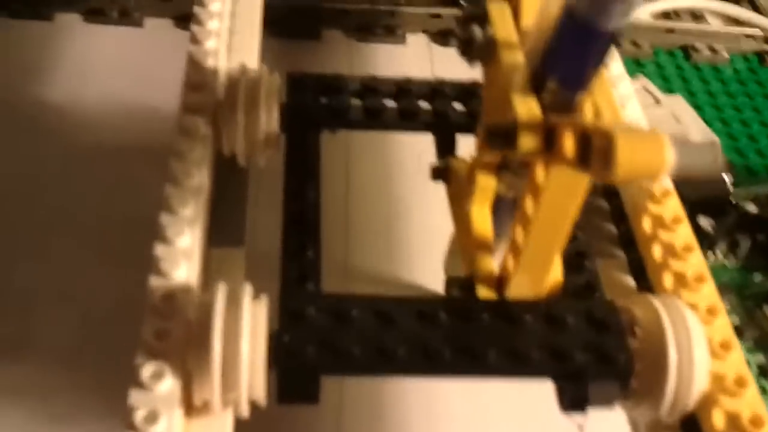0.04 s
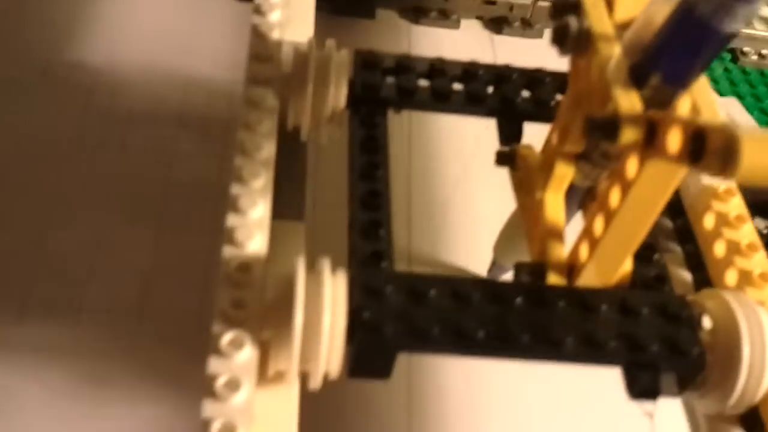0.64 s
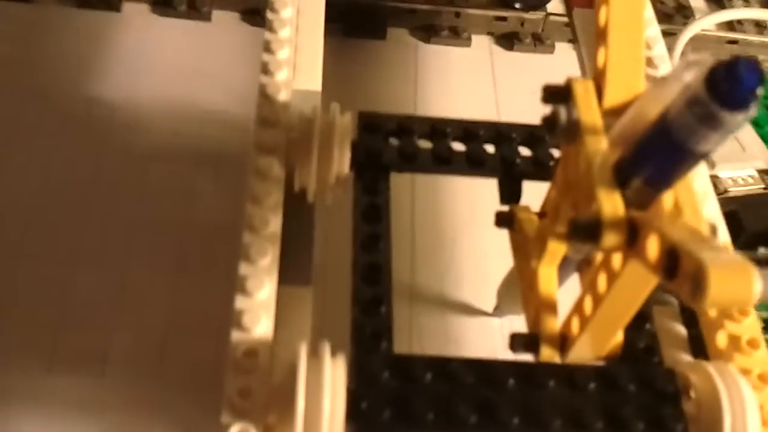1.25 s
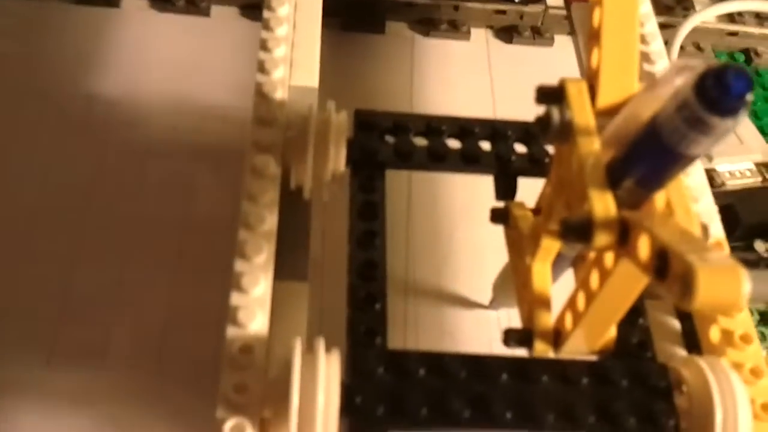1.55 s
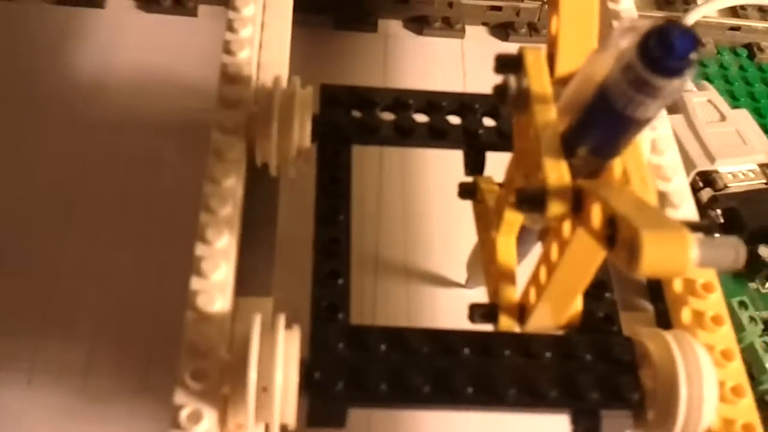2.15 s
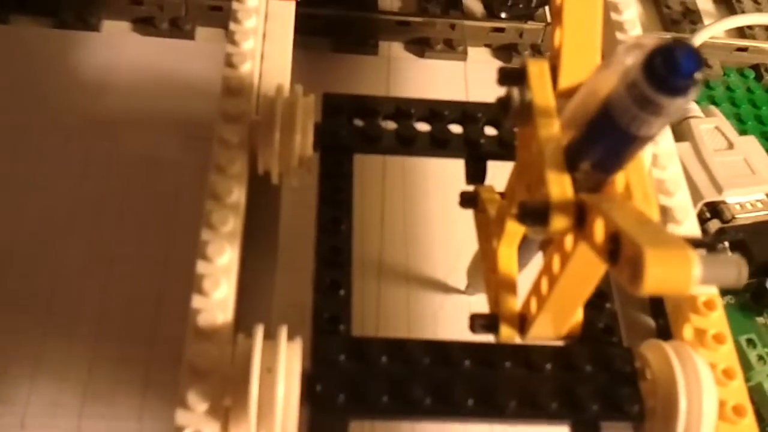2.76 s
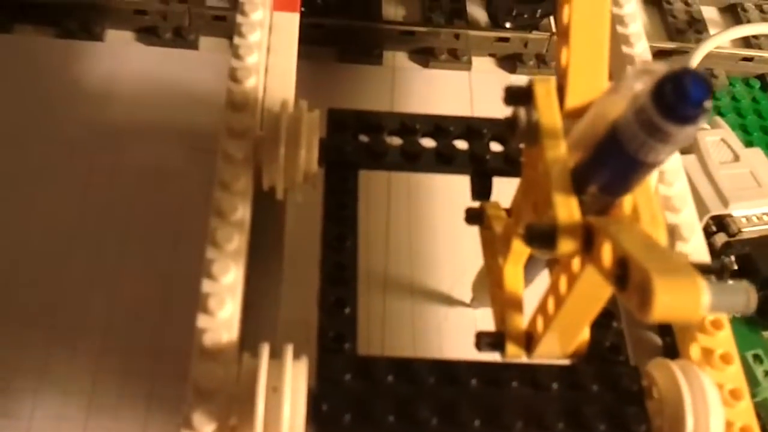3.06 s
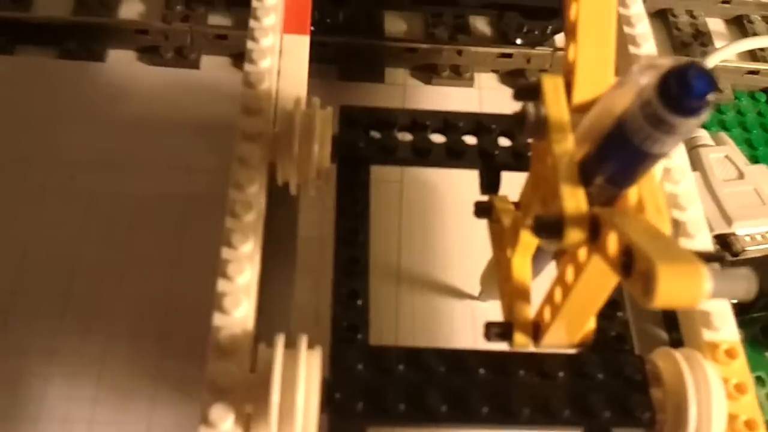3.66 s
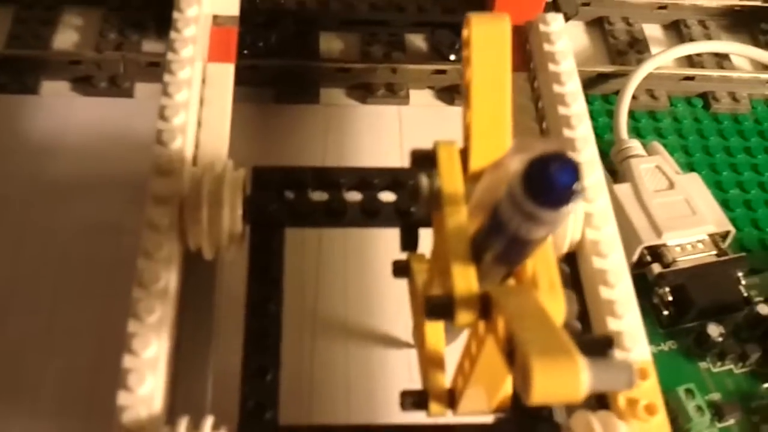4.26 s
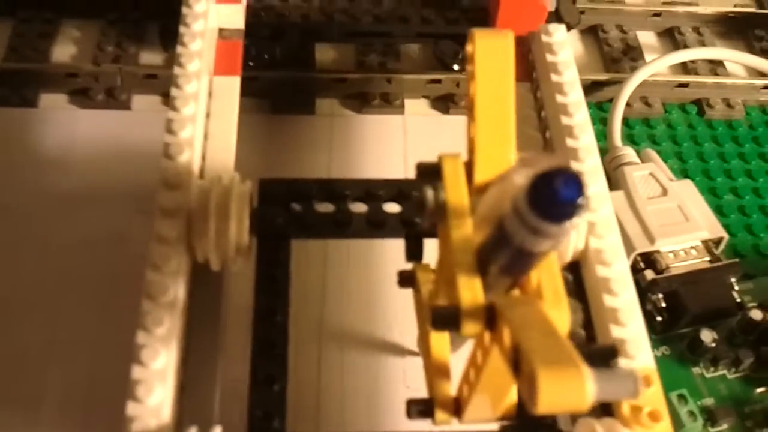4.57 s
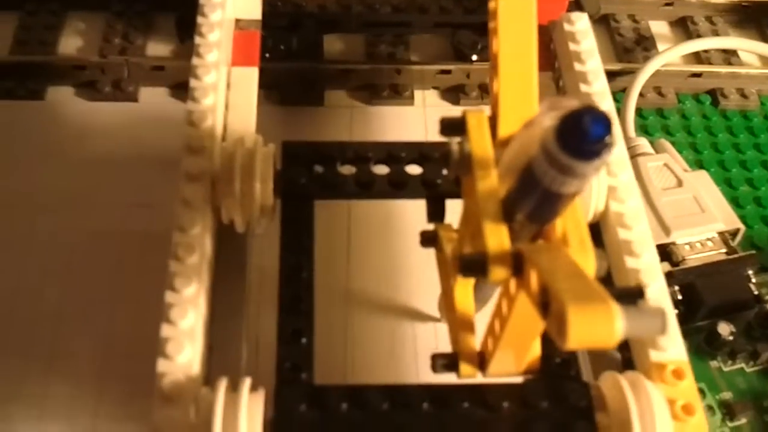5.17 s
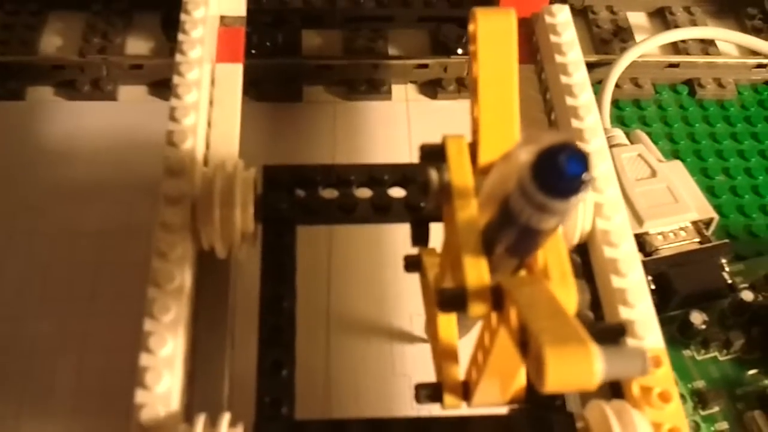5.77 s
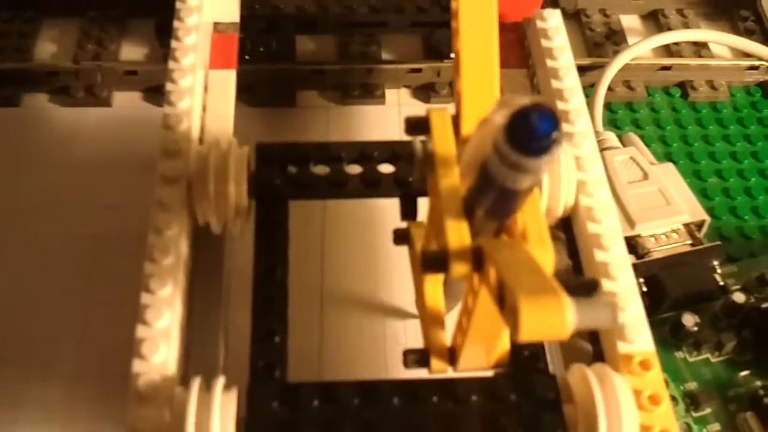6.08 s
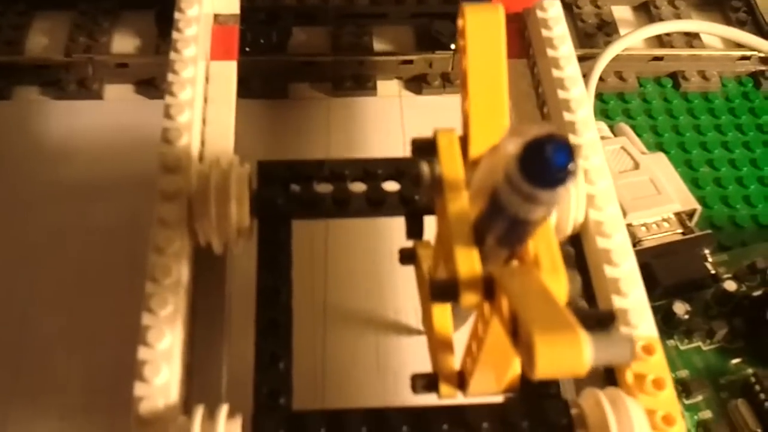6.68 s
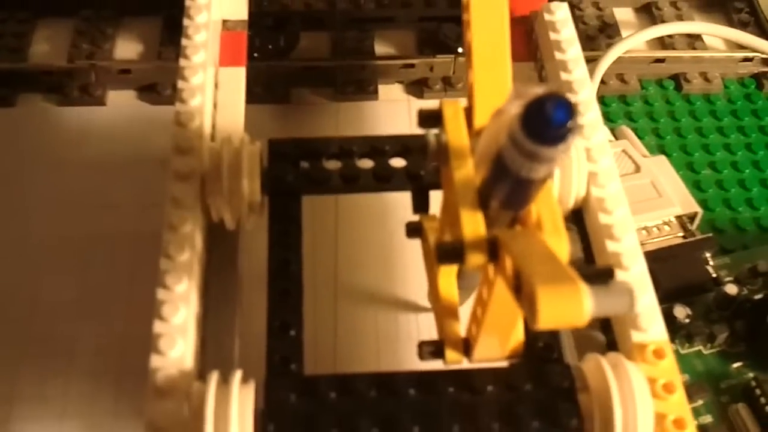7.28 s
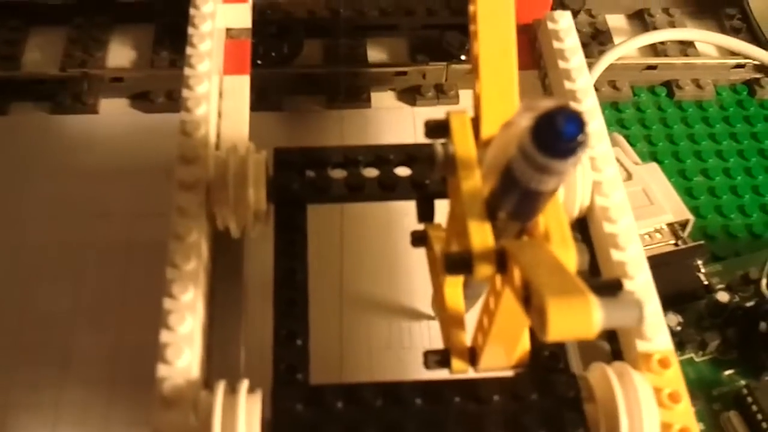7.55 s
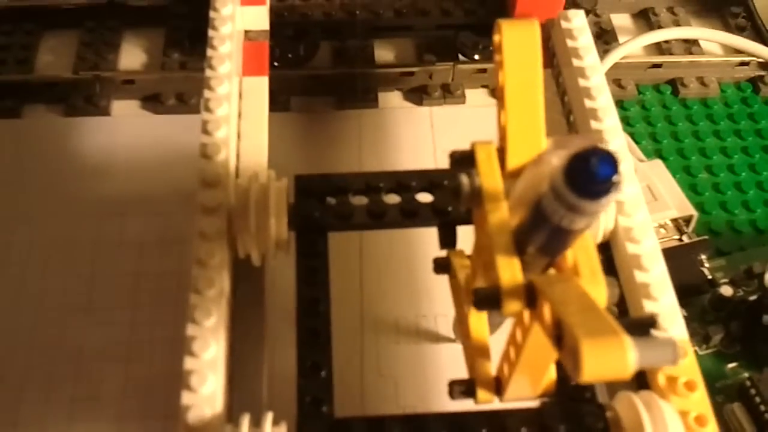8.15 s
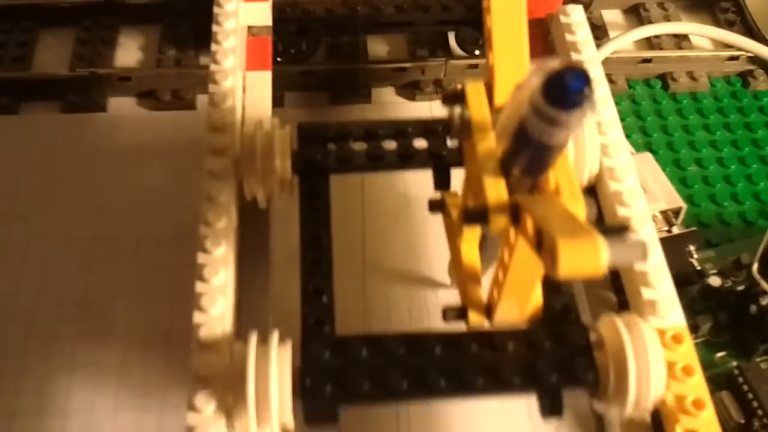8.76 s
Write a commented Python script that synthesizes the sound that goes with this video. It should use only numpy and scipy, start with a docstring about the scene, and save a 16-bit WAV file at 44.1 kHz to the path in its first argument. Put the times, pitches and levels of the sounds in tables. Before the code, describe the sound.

A toy-brick pen plotter clicks and clacks sharply up close, its small geared motor grinding in brief bursts.

```python
"""On a table in a small room, a toy-brick pen plotter draws short strokes close to a small microphone.
For each stroke a geared motor jerks the linkage (the jointed rods) into motion, grinds briefly and
stops with a rattle. In between, the pen arm snaps over, knocks on the frame and clicks home, and the
pen and its carriage rub softly. A low hum, a rumble and a hiss lie underneath.
The sharpest clicks overload the recorder."""
import sys
import numpy as np
from scipy import signal
from scipy.fft import rfft, irfft, next_fast_len
from scipy.io import wavfile

SR = 44100
rng = np.random.default_rng(int(sys.argv[2]) if len(sys.argv) > 2 else 0)


def output_pcm(signal):
    """Save a mono or channel-first signal as 16-bit PCM at the path in sys.argv[1].

    Samples are clipped to [-1, 1] before scaling.
    """
    pcm = np.clip(np.atleast_2d(signal).T, -1, 1) * 32767
    wavfile.write(sys.argv[1], SR, np.round(pcm).astype(np.int16))


N = 393372

SLACK_STROKES = [(1.7703, -45, -20.5, -17.5), (2.5342, -45, -19.5, -14), (3.1655, -47, -21, -17),
                 (4.774, -26.5, -19, -17.5), (5.9657, -26.5, -19.5, -18), (7.068, -27.5, -20, -17),
                 (8.2859, -26.5, -20, -18), (8.7828, -39.5, -22, -20)]
# short strokes, with the joint already tight: start_s, first_click_mids_vs_treble_db
TIGHT_STROKES = [(4.0963, -18), (5.4028, -13), (6.5498, -13.5), (7.7584, -16)]
SLACK_RUN_S, TIGHT_RUN_S = .1657, .1507  # how long the motor runs in each kind of stroke
# tone of small parts ticking and scraping: pitch_hz, level_db
SCRAPE_TONE = [(100, -29.5), (500, -10.5), (1500, -10), (2700, -1), (4300, -10.5), (6000, -7.5),
               (9000, -14)]
# tone of soft rubbing: pitch_hz, level_db
RUB_TONE = [(100, -12), (500, -13), (750, -0.5), (950, 1), (1300, -12.5), (2500, -8), (4500, -15),
            (8000, -21.5)]


def amp(db):
    """Turns decibels into a number to multiply by."""
    return 10 ** (np.asarray(db) / 20)


def level_at(tone, hz):
    """Level in dB at any pitch, joining the points of a tone table with straight lines."""
    pitch_hz, level_db = np.transpose(tone)
    return np.interp(np.log(hz + 1), np.log(pitch_hz + 1), level_db)


def unit(x):
    """Scales a sound to an energy of 1."""
    return x / np.sqrt(np.sum(x ** 2) + 1e-20)


def add(mix, start_s, sound):
    """Mixes a sound in at the given time."""
    part = mix[max(round(start_s * SR), 0):][:len(sound)]
    part += sound[:len(part)]


def shaped(x, tone):
    """Turns each pitch up or down as a tone table says."""
    size = next_fast_len(len(x))
    gain = amp(level_at(tone, np.fft.rfftfreq(size, 1 / SR)))
    return irfft(rfft(x, size) * gain, size)[:len(x)]


def noise(tone):
    """Noise with the given tone and a typical size of 1."""
    return unit(shaped(rng.standard_normal(N), tone)) * np.sqrt(N)


def drift(hz):
    """A random wobble with a typical size of 1, swinging up to hz times a second."""
    size = next_fast_len(N)
    slow = np.fft.rfftfreq(size, 1 / SR) < hz
    wobble = irfft(rfft(rng.standard_normal(size)) * slow, size)[:N]
    return unit(wobble) * np.sqrt(N)


def room_echo(build_s=0.0024, fade_s=0.36):
    """Sound bounces off table and walls, a little differently each time, fading 60 dB in fade_s."""
    t = np.arange(SR // 2) / SR
    rise = 1 - np.exp(-t / build_s)
    fade = np.exp(-np.log(1000) * t / fade_s)
    return unit(rng.standard_normal(len(t)) * rise * fade)


def ringing(tone, rings=(), size=4096):
    """How a part answers one sharp hit: a broad tone with peaks and dips at certain pitches."""
    hz = abs(np.fft.fftfreq(size, 1 / SR))
    peaks_db = sum(lift / (1 + (2 * (hz - pitch) / width) ** 2) for pitch, width, lift in rings)
    log_gain = np.log(amp(level_at(tone, hz) + peaks_db))
    spectrum = np.exp(np.conj(signal.hilbert(log_gain)))  # no sound comes before the hit
    return np.fft.ifft(spectrum).real[:size // 2]


def blow(bounces, scrape, chatter_db, chatter_s, scrape_s=.0011, jitter=.04, size=2048):
    """Force of a hard hit, its bounces (delay_s, level_db) and loose bricks chattering after it."""
    t = np.arange(size) / SR
    force = amp(chatter_db) * unit(rng.laplace(size=size) * np.exp(-t / chatter_s))
    for delay_s, db in [(0, 0.0083)] + bounces:
        hit = (t == 0) + scrape * unit(rng.standard_normal(size) * np.exp(-t / scrape_s))
        add(force, delay_s * (1 + jitter * rng.uniform(-1, 1)), amp(db) * unit(hit))
    return force


def balanced(x, levels_db):
    """Gives the treble, mids and lows of a click each its own level."""
    # treble, mids and lows: from_hz, to_hz
    band_edges = [(3500, 12000), (1200, 3500), (120, 1200)]
    bands = (signal.butter(3, edges, "bandpass", fs=SR, output="sos") for edges in band_edges)
    return sum(amp(db) * unit(signal.sosfilt(band, x)) for band, db in zip(bands, levels_db))


def clicks(rows, rings, gain_db, echo_db, blur=1.9, ring_share=0.74, **touch):
    """Blows ring plastic parts. Rows: start_s, treble_db, mids_vs_treble_db, lows_vs_treble_db."""
    # tone of any plastic click: pitch_hz, level_db
    plastic = [(60, -23.5), (200, -1.5), (450, -1), (900, -8), (1800, -7), (3400, -7), (5000, -1.5),
               (6500, 4), (7800, 4), (9000, 4.5), (12000, -25.5)]
    out = np.zeros(N)
    near = ringing(plastic, rings)
    # the room hears the part from all sides, so the echo's peaks are wider and lower
    far = ringing(plastic, np.array(rings) * [1, blur, ring_share])
    for s, db, mids_db, lows_db in rows:
        direct = balanced(signal.fftconvolve(blow(**touch), near), [0, mids_db, lows_db])
        echo = balanced(signal.fftconvolve(room_echo(), far), [0, mids_db + 1.5, lows_db + 5.5])
        add(out, s, amp(db + gain_db) * direct)
        add(out, s, amp(db + gain_db + echo_db) * echo)
    return out


def taps(rows, tone, gain_db, echo_db, **touch):
    """Softer blows on a part that hardly rings, each with its echo. Rows: start_s, level_db."""
    out, part = np.zeros(N), ringing(tone)
    for s, db in rows:
        force = amp(echo_db) * room_echo()
        add(force, 0, unit(blow(scrape=1.0, **touch)))
        add(out, s, amp(db + gain_db) * unit(signal.fftconvolve(force, part)))
    return out


def friction(rows, tone, gain_db, echo_db=-5, uneven=0.62):
    """Sliding parts make a rough noise that swells and fades. Rows: start_s, length_s, level_db."""
    pressure = np.zeros(N)
    for s, length_s, db in rows:
        add(pressure, s, amp(db + gain_db) * signal.windows.tukey(round(length_s * SR), .6))
    out = noise(tone) * pressure * (1 + uneven * drift(73))
    return out + amp(echo_db) * signal.fftconvolve(out, room_echo())[:N]


def motor_runs(slack_db=-43.5, tight_db=-42.5):
    """Lists every run of the motor: start_s, stop_s, level_db."""
    return ([(s, s + SLACK_RUN_S, slack_db) for s, *_ in SLACK_STROKES]
            + [(s, s + TIGHT_RUN_S, tight_db) for s, _ in TIGHT_STROKES])


def hum(pitch_hz=60.73, gain_db=0.5, flutter_db=4.0, wander_hz=1.694, waver_hz=4.36):
    """A low hum swells, flutters and wanders in pitch, with faint unsteady higher tones."""
    # the hum's rise and fall: time_s, level_db
    swells = [(0.0, -49), (1.86, -41), (2.11, -32.5), (2.31, -58), (2.58, -40.5), (3.45, -37.5), (3.6, -48),
              (3.72, -35), (4.52, -36.5), (4.6, -49.5), (5.04, -35.5), (6.73, -42.5), (7.03, -34.5),
              (7.18, -47.5), (8.27, -37), (8.37, -50), (8.77, -41.5), (8.92, -57)]
    # its higher tones: pitch_multiple, level_db
    overtones = [(2.08, -53.5), (3.001, -58.5)]
    level_db = np.interp(np.arange(N) / SR, *np.transpose(swells)) + flutter_db * np.tanh(drift(6))
    hz = pitch_hz + wander_hz * drift(4)
    out = amp(level_db + gain_db) * np.sin(2 * np.pi * np.cumsum(hz) / SR)
    for multiple, db in overtones:
        cycles = np.cumsum(multiple * pitch_hz + waver_hz * drift(12)) / SR
        out += amp(db) * (1 + 0.63 * drift(9.9)) * np.sin(2 * np.pi * cycles)
    return np.sqrt(2) * out


def background(rumble_db=-45, swell_db=3.0, hiss_db=-56.5):
    """A deep rumble rises and falls restlessly under a steady hiss."""
    # tones of the rumble and the hiss: pitch_hz, level_db
    rumble_tone = [(15, -9.5), (38, -8), (50, -12), (75, -1.5), (98, -8.5), (115, -8.5), (138, -8.5),
                   (160, -16.5), (205, -12), (280, -25.5), (450, -30.5), (1200, -53.5), (4000, -81.5)]
    hiss_tone = [(100, 6.5), (400, 8.5), (950, 5.5), (1300, 3), (3000, -2), (7500, -5), (9500, -9)]
    rumble = amp(rumble_db) * noise(rumble_tone) * amp(swell_db * drift(5))
    return rumble + amp(hiss_db) * noise(hiss_tone)


def pen_arm(slide_s=.027, snap_lows_db=-25, home_db=-16.5, home_mids_db=-16, home_lows_db=-24):
    """The arm slides briefly, snaps over, knocks on the frame and clicks home."""
    # the arm's moves: snap_s, treble_db, mids_vs_treble_db, slide_db, home_delay_s,
    # knock_delay_s, knock_db
    moves = [(0.3983, -11.5, -15, -44, 0.047, .0669, -16), (2.0872, -13, -16, -43.5, .0461, 0.014, -23),
             (3.6618, -12.5, -18, -42, 0.041, .013, -32), (4.4347, -11.5, -19, -55.5, 0.043, 0.0092, -23),
             (5.0837, -10.5, -22.5, -57, 0.043, 0.0097, -18),
             (5.6878, -10.5, -17.5, -55, 0.042, 0.012, -23.5), (6.293, -11, -15.5, -50, .0429, .009, -20),
             (6.7993, -10.5, -17, -43, .0433, .011, -22), (7.4836, -10, -18, -48, 0.043, 0.012, -21.5),
             (7.9905, -11.5, -16.5, -44, .0432, .010, -24.5), (8.524, -12, -17.5, -39, 0.044, 0.012, -24.5)]
    # how the parts ring in the snap and in the click home: pitch_hz, width_hz, lift_db
    snap_rings = [(4140, 600, -3.5), (6020, 300, 1.5), (6890, 160, 1), (6940, 100, 3.5), (7204, 340, 10),
                  (7640, 160, 1.5)]
    home_rings = [(2480, 1400, 7), (3880, 220, 8), (5746, 180, 10.5), (6220, 330, 12), (6780, 180, -19),
                  (7440, 400, 9), (8530, 210, 7)]
    # tone of the knocked frame: pitch_hz, level_db
    frame_tone = [(100, -21), (400, -15), (800, -15.5), (1200, 0.5), (1450, -3.5), (1800, -10), (2250, 5),
                  (2600, -0.5), (3100, -10), (4500, -11), (9000, -36.5)]
    slides, snaps, homings, knocks = [], [], [], []
    usual_mids_db = np.mean([move[2] for move in moves])
    for s, db, mids_db, slide_db, home_delay_s, knock_delay_s, knock_db in moves:
        slides.append((s - slide_s, slide_s, slide_db))
        snaps.append((s, db, mids_db, snap_lows_db))
        fuller_db = 0.42 * (mids_db - usual_mids_db)  # a fuller snap has a fuller click home
        homings.append((s + home_delay_s, home_db, home_mids_db + fuller_db, home_lows_db))
        knocks.append((s + knock_delay_s, knock_db))
    slide = friction(slides, SCRAPE_TONE, gain_db=-1.0)
    snap = clicks(snaps, snap_rings, gain_db=25.5, echo_db=-8.5, blur=1.7, ring_share=.85,
                  bounces=[(.0011, -1.5), (.0035, -14)], scrape=1.7, chatter_db=-1.5, chatter_s=0.0055)
    home = clicks(homings, home_rings, gain_db=26.0, echo_db=-16,
                  bounces=[(.001, -2.5), (.0025, -18.5)], scrape=1.6, chatter_db=-4.5, chatter_s=0.00566)
    knock = taps(knocks, frame_tone, gain_db=19.5, echo_db=-9.0,
                 bounces=[(.003, -1)], chatter_db=1.0, chatter_s=0.006)
    return slide + snap + home + knock


def ticks(catch_delay_s=0.029):
    """Parts tick as they settle, and the gears tick as they catch just after a slack start."""
    # stray ticks of settling parts: start_s, level_db
    settling = [(.495, -27), (2.150, -27), (2.178, -23), (3.835, -34.5), (4.615, -40.5)]
    catches = [(s + catch_delay_s, db) for s, db, *_ in SLACK_STROKES]
    return taps(settling + catches, SCRAPE_TONE, gain_db=20, echo_db=-6,
                bounces=[(.002, 0)], chatter_db=3, chatter_s=0.011)


def pen_rubbing():
    """The pen and its carriage rub softly between strokes."""
    # each rub: start_s, length_s, level_db
    rubs = [(.5, .11, -51.5), (1.05, 0.68, -70), (5.22, 0.084, -55.5), (5.84, 0.099, -54.5),
            (6.17, 0.083, -55.5), (6.43, 0.06, -57), (6.92, 0.12, -57), (7.4, 0.047, -53),
            (7.55, 0.045, -50.5), (8.05, 0.047, -48.5)]
    return friction(rubs, RUB_TONE, gain_db=3.5)


def linkage_tightening(lead_s=0.043, length_s=0.038, level_db=-54.5):
    """The linkage rubs as it tightens before each stroke; a slack joint adds a brighter scrape."""
    scrapes = [(s - lead_s, length_s, level_db) for s, *_ in SLACK_STROKES]
    rubs = [(s - lead_s, length_s, level_db) for s, *_ in motor_runs()]
    return friction(scrapes, SCRAPE_TONE, gain_db=2.0) + friction(rubs, RUB_TONE, gain_db=0.5)


def slack_starts(treble_db=-15, mids_db=-18, lows_db=-23):
    """A slack joint slips twice, then catches with a click as a long stroke starts."""
    # how the slack joint rings: pitch_hz, width_hz, lift_db
    rings = [(2940, 520, 4), (4250, 500, -2), (5000, 120, 3.4), (5800, 150, 5), (6400, 350, 2.9),
             (6820, 270, 11.5)]
    starts = [(s, treble_db, mids_db, lows_db) for s, *_ in SLACK_STROKES]
    out = clicks(starts, rings, gain_db=24.5, echo_db=-16,
                 bounces=[(.0007, -12), (.0024, -16)], scrape=1.2, chatter_db=-2.0, chatter_s=0.0055)
    for lead_s, slip_db in [(0.0055, 13.7), (0.0022, 14.4)]:
        slips = [(s - lead_s, *levels) for s, *levels in starts]
        out += clicks(slips, rings, gain_db=slip_db, echo_db=-7.0,
                      bounces=[], scrape=0.66, chatter_db=5.5, chatter_s=0.0015)
    return out


def geared_motor(teeth_per_s=900, spread_db=4, rub=0.28, whine_hz=385, whine_db=-11, echo_db=-7):
    """Gear teeth tick and rub over the motor's unsteady whine, louder as they gather speed."""
    # tone of the running gears: pitch_hz, level_db
    gear_tone = [(100, -4), (250, 1), (390, -6), (600, -11.5), (900, -6.5), (1600, -7.5), (2400, -1),
                 (3200, -4.5), (4500, -7.5), (6000, -10.5), (8000, -7.5), (10000, -52.5)]
    t = np.arange(N) / SR
    hits = rng.random(N) < teeth_per_s / SR
    strength = amp(spread_db * np.minimum(rng.exponential(1, N), 4))
    teeth = hits * strength * rng.choice([-1, 1], N)
    grind = unit(shaped(teeth + rub * rng.standard_normal(N), gear_tone)) * np.sqrt(N)
    hz = whine_hz * (1 + 0.046 * drift(25.05))
    whine = amp(whine_db) * np.sin(2 * np.pi * np.cumsum(hz) / SR)
    loudness = np.zeros(N)
    for start_s, stop_s, db in motor_runs():
        times_s = [start_s, start_s + 0.049, stop_s - .05, stop_s, stop_s + 0.02]
        loudness += amp(db) * np.interp(t, times_s, [0, amp(-4), 1, .85, 0])
    out = (grind + whine) * loudness
    return out + amp(echo_db) * signal.fftconvolve(out, room_echo())[:N]


def stop_rattles(mids_db=-12, tight_db=-23.5, tight_lows_db=-15):
    """The linkage bounces and rattles as each stroke ends."""
    # how the stopping parts ring: pitch_hz, width_hz, lift_db
    rings = [(583, 110, 6.8), (866, 110, 6.3), (3850, 170, 9.9), (4800, 350, 4.6), (5600, 260, 8.6),
             (6830, 180, 7), (7200, 180, 4.2)]
    stops = [(s + SLACK_RUN_S, db, mids_db, lows_db) for s, _, db, lows_db in SLACK_STROKES]
    stops += [(s + TIGHT_RUN_S, tight_db, mids_db, tight_lows_db) for s, _ in TIGHT_STROKES]
    return clicks(stops, rings, gain_db=26.5, echo_db=-13.5,
                  bounces=[(.0024, -1.5), (.0044, -8)], scrape=0.94, chatter_db=-1.5, chatter_s=0.0092)


def tight_starts(treble_db=-14.5, lows_db=-24):
    """A joint that is already tight clicks without slipping as a short stroke starts."""
    # how the tight joint rings: pitch_hz, width_hz, lift_db
    rings = [(2280, 970, 12.8), (3700, 130, 4.9), (4685, 190, 7.7), (5800, 200, 6.8), (6050, 450, 8.8),
             (7400, 240, 2.5)]
    starts = [(s, treble_db, mids_db, lows_db) for s, mids_db in TIGHT_STROKES]
    return clicks(starts, rings, gain_db=27.5, echo_db=-12.0,
                  bounces=[(.0009, 1), (.0022, -11)], scrape=0.82, chatter_db=-1, chatter_s=0.0037)


def scene():
    """The plotter in its room, over hum, rumble and hiss, in one channel."""
    arm = pen_arm()
    linkage = slack_starts() + tight_starts() + stop_rattles() + linkage_tightening()
    plotter = arm + linkage + ticks() + geared_motor() + pen_rubbing()
    return (plotter + hum() + background())[None]


def record(dry, ceiling=0.76, clip_level=0.66, top_hz=16200):
    """The recorder squashes the loudest clicks, cuts the high treble and clips the peaks that remain."""
    # tone of the recorder: pitch_hz, gain_db
    recorder_tone = [(20, -2), (7800, 2.5), (8400, -6.5), (8800, -20), (9200, -39.5), (9800, -71.5)]
    loudness = abs(signal.hilbert(dry[0], next_fast_len(N)))[:N]
    squashed = dry[0] / (1 + (loudness / ceiling) ** 4) ** (1 / 4)
    clipped = np.clip(shaped(squashed, recorder_tone), -clip_level, clip_level)
    top_cut = signal.firwin(255, top_hz, window=("kaiser", 9), fs=SR)
    return signal.oaconvolve(clipped, top_cut, "same")[None]


dry = scene()
out = record(dry)
output_pcm(out)
```